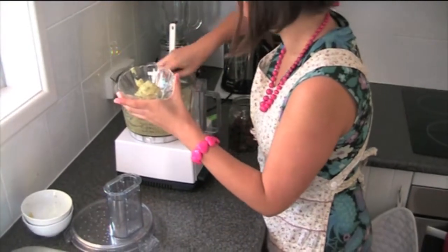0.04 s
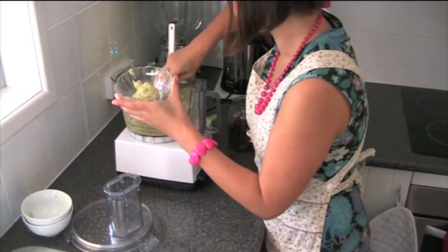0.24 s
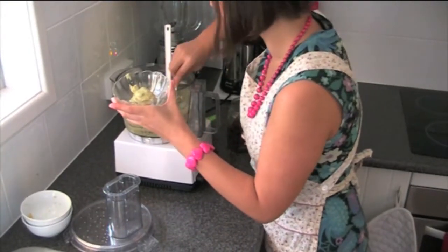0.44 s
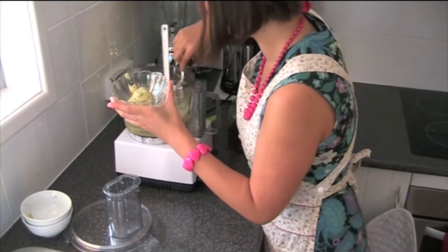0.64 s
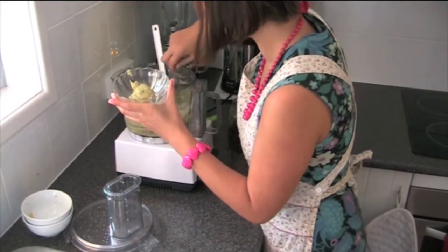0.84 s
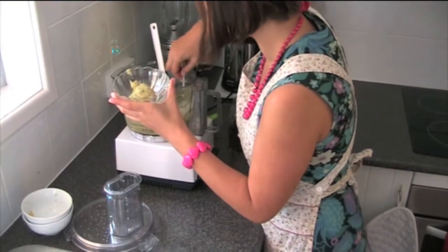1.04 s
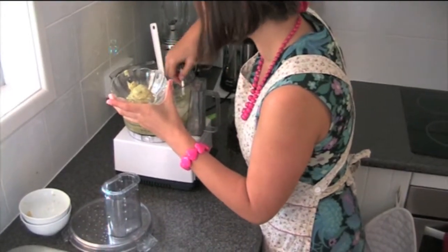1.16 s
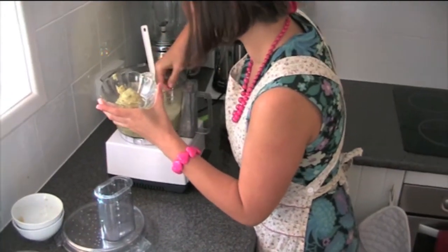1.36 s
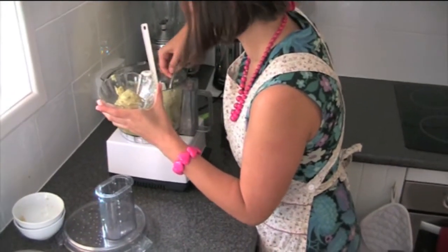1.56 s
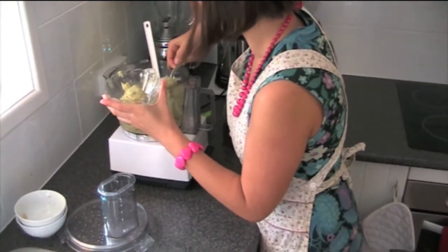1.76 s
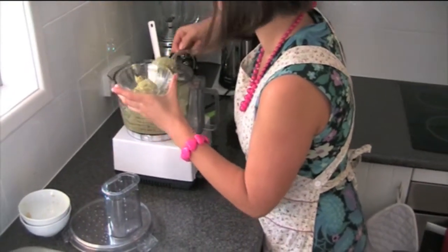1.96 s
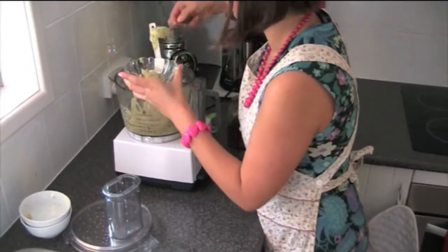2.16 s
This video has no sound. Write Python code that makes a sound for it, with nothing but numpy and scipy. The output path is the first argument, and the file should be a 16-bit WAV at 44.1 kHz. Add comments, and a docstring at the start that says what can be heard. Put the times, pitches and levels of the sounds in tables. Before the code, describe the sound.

Spoon knocks on a plastic processor bowl, close in stereo, start with a hard blow at 0 s. More knocks come at 0.16-0.2, then a bright squeaky scrape rises and falls from 0.25 to 0.4. Irregular hollow clatter runs 0.65-1.08, strongest near 0.8. Softer knocks and squeaks come at 1.24-1.4, then faint sticky smacks and a light tap at 1.55-1.8. Short tiled-kitchen echoes, very faint hum.

```python
"""A hard knock opens the take: a metal spoon scoops food from a plastic processor bowl, close to a stereo
microphone in a small tiled kitchen. Bursts of tiny touches set the bowl's modes ringing; sliding over fine
ridges squeaks at the ridge rate and its multiples, with a noise hiss. Late on come a light tap of ringing
modes and puffs of noise as sticky food lets go. Decaying noise gives the echoes, coloured noise the hum."""
import sys
import numpy as np
from scipy import signal
from scipy.fft import rfft, irfft, next_fast_len
from scipy.io import wavfile
from scipy.ndimage import uniform_filter1d

SR = 44100
rng = np.random.default_rng(int(sys.argv[2]) if len(sys.argv) > 2 else 0)


def inscribe(sig):
    """Save sig as 16-bit PCM at rate SR to the path in sys.argv[1].

    A 1-D sig is mono; a 2-D sig holds one channel per row.
    Samples are clipped to [-1, 1] before scaling.
    """
    pcm = np.round(np.clip(np.atleast_2d(sig).T, -1, 1) * 32767)
    wavfile.write(sys.argv[1], SR, pcm.astype(np.int16))


N = 97505
CUTOFF_HZ = 15800   # squeak partials stop here; the treble of the whole scene ends just above


def from_db(db):
    """Decibels to an amplitude factor."""
    return 10 ** (np.asarray(db) / 20)


def rms_one(x):
    """Scale a signal to rms 1."""
    return x / np.sqrt(np.mean(x ** 2) + 1e-20)


def at_hz(points, hz):
    """Read a frequency table at hz, in straight lines over log frequency."""
    points = np.array(points)
    return np.interp(np.log(hz), np.log(points[:, 0]), points[:, 1])


def bin_hz(size):
    """Spectrum bin frequencies, kept above zero for the logarithm."""
    return np.maximum(np.fft.rfftfreq(size, 1 / SR), 1)


def band(x, low, high):
    """Pass only low to high [Hz]."""
    return signal.sosfilt(signal.butter(2, [low, high], "band", fs=SR, output="sos"), x + 1e-18)


def drift(rate, count):
    """Smooth random wander, spread 1: noise through two equal low-passes at rate [Hz]."""
    r = np.exp(-2 * np.pi * rate / SR)
    noise = rng.standard_normal(count + 2000)
    return rms_one(signal.lfilter([1], [1, -2 * r, r * r], noise)[2000:])   # skip the settling


def ring(clicks, hz, t60):
    """A resonator: a unit click starts a sine of height 1 that falls 60 dB in t60 [s]."""
    r = from_db(-60 / (t60 * SR))
    w = 2 * np.pi * hz / SR
    return signal.lfilter([0, np.sin(w)], [1, -2 * r * np.cos(w), r * r], clicks + 1e-18)


def left_right(mid, side, alike):
    """Mix two independent spectra into left and right with the given likeness."""
    return np.sqrt(1 + alike) * mid + np.sqrt(1 - alike) * side * [[1], [-1]]


# likeness of the left and right channels for steady noise: (frequency [Hz], likeness [-1 to 1])
NOISE_LIKENESS = [(30, -0.56), (100, -0.18), (300, -0.66), (1000, -0.23), (4000, 0.12), (12000, 0.072)]


def coloured(spectrum):
    """Stereo noise shaped by a spectrum table, left and right alike by band; rms 1."""
    hz = bin_hz(N)
    mid, side = rfft(rng.standard_normal((2, N))) * from_db(at_hz(spectrum, hz))
    return rms_one(irfft(left_right(mid, side, at_hz(NOISE_LIKENESS, hz)), N))


# spectrum shape of the room's faint hum: (frequency [Hz], relative level [dB per Hz])
HUM_SPECTRUM = [(20, -0.5), (45, 0.5), (91, 6), (168, -4.5), (248, 6), (357, -1.5), (700, -4.5), (786, 3),
                (880, -9), (1200, -8.5), (2080, -7.5), (2400, -10), (3500, -9.5), (7000, -16.5),
                (13500, -30), (16000, -28)]
HUM_DB = -49.5   # rms


def room_hum():
    """The kitchen's background: steady noise, strongest in the bass."""
    return from_db(HUM_DB) * coloured(HUM_SPECTRUM)


# how long the tiled kitchen rings: (frequency [Hz], 60 dB decay [s])
KITCHEN_DECAY = [(200, 0.56), (1000, 0.36), (4000, 0.39), (12000, 0.15)]
# likeness of the reverberation in the two channels: (frequency [Hz], likeness [-1 to 1])
ECHO_LIKENESS = [(300, .9), (1000, .88), (3000, .72), (10000, .5)]
ECHO_BUILD_S = 0.0011


def kitchen(x):
    """Dense echoes off the tiles: noise that builds up, then dies at its own pace in each band."""
    t = np.arange(SR) / SR
    edges = 150 * 2 ** np.arange(0, 7, .74)
    tail = 0
    for low, high in zip(edges, edges[1:]):
        decay = from_db(-60 * t / at_hz(KITCHEN_DECAY, low))
        tail = tail + band(rng.standard_normal((2, SR)), low, high) * decay
    tail = tail * (1 - np.exp(-t / ECHO_BUILD_S)) / np.sqrt(np.sum(tail ** 2) / 2)
    size = next_fast_len(N + SR)
    mid, side = rfft(tail, size)
    stereo_tail = left_right(mid, side, at_hz(ECHO_LIKENESS, bin_hz(size)))
    return irfft(stereo_tail * rfft(x, size), size)[:, :N]


# sticky food letting go: (time [s], level before band-passing [dB], decay time constant [s])
SMACKS = [(1.555, -48, 0.0049), (1.636, -43, 0.02), (1.787, -45, 0.0084)]


def smacks():
    """Sticky food lets go: bright puffs of noise that start at once and die away."""
    t = np.arange(N) / SR
    level = np.zeros(N)
    for start, db, length in SMACKS:
        level += from_db(db) * (t > start) * np.exp(-np.abs(t - start) / length)
    return level * band(rng.standard_normal((2, N)), 5160, 10100)


# modes of something small and hard: (frequency [Hz], relative level [dB], 60 dB decay [s])
TAP_MODES = [(1870, 1, .04), (3070, 0, .018), (1500, -2, .008), (3700, -4, .006)]
TAP_S, TAP_DB = 1.716, -37   # time, level of the click that drives the modes


def tap():
    """A light tap on something small and hard: one click rings a few short modes."""
    click = np.zeros(N)
    click[int(TAP_S * SR)] = from_db(TAP_DB)
    modes = sum(from_db(db) * ring(click, hz, t60) for hz, db, t60 in TAP_MODES)
    return band(modes, 1300, 9000)


# spoon slides: (time [s], ridges crossed per second [Hz], squeak level [dB], rubbing level [dB])
SLIDE_UP = [(.25, 1700, -42, -45), (.262, 2000, -31, -40), (.297, 3400, -35, -40), (.312, 4130, -33, -46),
            (.325, 4380, -33, -46), (.339, 4230, -34, -44), (.352, 3400, -34, -39), (.372, 1600, -37, -36),
            (.4, 500, -41, -41)]
SLIDE_BACK = [(1.268, 1753, -45, -44), (1.284, 2310, -41.5, -46), (1.305, 2245, -40.5, -55),
              (1.325, 2075, -39, -51), (1.344, 1770, -33.5, -58)]
SLIDE_SLOW = [(1.338, 800, -47, -46), (1.358, 790, -46, -41), (1.41, 780, -60, -54)]
# ridge rate and its multiples, at full speed: (relative level [dB]), lowest first
OVERTONE_DB = [0, -4, -4.5, -14, -14, -17, -19, -19]
# spectrum shape of the rubbing hiss: (frequency [Hz], relative level [dB per Hz])
RUB_SPECTRUM = [(300, -10), (1000, -14), (2500, -4.5), (5000, -13.5), (11000, -10), (13500, -14),
                (16000, -43)]
SQUEAK_FLUTTER_DB, SQUEAK_WOBBLE_HZ = 3, 55          # spreads of partial level and ridge rate
FULL_SPEED_HZ, OVERTONE_DB_PER_KHZ = 4300, 3.5       # the multiples weaken at slower rates


def slides():
    """Ridges passing under the spoon sing at their rate and its multiples; a rubbing hiss goes along."""
    squeak, rub = np.zeros(N), np.zeros(N)
    for rows in (SLIDE_UP, SLIDE_BACK, SLIDE_SLOW):
        s, hz, db, rub_db = np.transpose(rows)
        at = np.arange(int(s[0] * SR), int(s[-1] * SR))
        fade = np.clip(np.minimum(at - at[0], at[-1] - at) / (0.005 * SR), 0, 1)
        glide = uniform_filter1d(np.interp(at / SR, s, hz), size=600, mode="nearest")
        speed_db = OVERTONE_DB_PER_KHZ * (glide - FULL_SPEED_HZ) / 1000
        rate = glide + SQUEAK_WOBBLE_HZ * drift(570, len(at))
        turn = 2 * np.pi * np.cumsum(rate) / SR
        tone = np.zeros(len(at))
        for k, level in enumerate(OVERTONE_DB, start=1):
            flutter_db = SQUEAK_FLUTTER_DB * drift(144, len(at))
            # speed spares the ridge rate itself, counts once for the second and twice above
            partial_db = level + speed_db * min(k - 1, 2) + flutter_db
            tone += from_db(partial_db) * np.sin(k * turn) * (k * rate < CUTOFF_HZ)
        squeak[at] += fade * from_db(np.interp(at / SR, s, db)) * tone
        rub[at] += fade * from_db(np.interp(at / SR, s, rub_db))
    return squeak + rub * rms_one(coloured(RUB_SPECTRUM)[0])


# borders of the seven bands that each knock excites: (frequency [Hz])
BAND_EDGES_HZ = [230, 420, 1000, 1350, 2050, 2500, 4500, 13000]
# spoon on the bowl wall: (time [s], force level in the top band [dB], chatter decay time constant [s],
# then six force levels in the lower bands, from the boom upwards [dB])
KNOCKS = [(0.0004, -19.5, 0.0069, -30.5, -23.5, -26.5, -36, -24, -20),
          (0.158, -23.5, 0.012, -53, -28.5, -25.5, -32.5, -32, -40.5),
          (0.1768, -41.5, 0.0058, -34.5, -33.5, -22, -27.5, -29, -35),
          (0.2031, -25, 0.0061, -34, -53, -25.5, -32, -47, -26),
          (0.4013, -25, 0.0065, -37.5, -29, -29, -32, -33, -23.5),
          (0.4112, -68, 0.0024, -32.5, -33, -28.5, -36, -35, -30.5),
          (0.6471, -39.5, 0.006, -58, -36, -37, -51, -33, -62),
          (0.6504, -24, 0.0072, -35, -34, -29.5, -27, -22.5, -27.5),
          (0.6558, -60, 0.0032, -37, -40, -36, -26, -24, -42),
          (0.6662, -52, 0.011, -33, -36, -34, -55, -31, -59),
          (0.6978, -61, 0.0023, -38.5, -42, -39, -47, -32.5, -67),
          (0.7742, -22.5, 0.0056, -36, -38, -40, -25.5, -29, -29.5),
          (0.8007, -18.5, 0.0043, -40.5, -16.5, -24.5, -31, -24, -18),
          (0.8154, -61, 0.0026, -54, -22, -36, -62, -35.5, -52),
          (0.8567, -36.5, 0.009, -33.5, -41, -40, -30, -49, -63),
          (0.9654, -31.5, 0.0041, -56, -30, -21.5, -39, -22, -69),
          (0.9772, -62, 0.0046, -35.5, -36, -30, -25.5, -45, -36),
          (1.0203, -41, 0.0061, -26.5, -27.5, -26, -37, -60, -34),
          (1.0842, -43, 0.024, -47, -49, -51, -48, -59, -38.5),
          (1.237, -43, 0.0067, -64, -36.5, -42, -46, -40.5, -44),
          (1.2484, -46, 0.014, -34.5, -38, -47, -43, -46.5, -43),
          (1.2644, -37.5, 0.01, -38.5, -37.5, -38.5, -34.5, -58, -53),
          (1.2861, -46, 0.011, -45, -37, -41.5, -48, -45, -38)]
TOUCHES_PER_S, TOUCH_SPREAD_DB = 3000, 1.5
FIRST_TOUCH_DB, TOUCH_RISE_S = 7, 0.0015   # first touch before the rise; slope of the rise
BOOM_LAG_S = .007                          # the boom swells after the blow


def touches():
    """Each knock is a first touch and a dying chatter of random ones; one force train per band."""
    force = np.zeros((len(BAND_EDGES_HZ) - 1, N + SR))
    span = np.arange(SR // 20)
    t = span / SR
    for start, top_db, length, *lower_db in KNOCKS:
        hit = rng.random(len(span)) < TOUCHES_PER_S / SR
        strength = from_db(TOUCH_SPREAD_DB * rng.standard_normal(len(span)))
        train = hit * strength * rng.choice([-1, 1], len(span))
        train[0] = from_db(FIRST_TOUCH_DB)
        train = train * np.exp(-t / length) * np.minimum(0.42 + t / TOUCH_RISE_S, 1)
        train /= np.sqrt(np.sum(train ** 2))
        force[:, int(start * SR) + span] += from_db(lower_db + [top_db])[:, None] * train
    force[0] = np.roll(force[0], int(BOOM_LAG_S * SR))
    return force[:, :N]


# modes of the plastic bowl: (frequency [Hz], relative level [dB], 60 dB decay before the cap [s])
BOWL_MODES = [(289, 9, 0.081), (318, -1.5, 0.13), (451, -8, 0.067), (500, -3.5, 0.04), (570.6, -6, 0.14),
              (622, 8, 0.016), (890, 0.5, 0.1), (1095, 1.5, 0.05), (1168, -0.5, 0.013), (1500, -5, 0.052),
              (1904, 5, 0.038), (2224, 6.5, 0.07), (2358, 3.5, 0.038), (3090, 0, 0.02), (3680, 0, 0.021)]
LONGEST_RING_CYCLES = 50   # caps the 60 dB decay
RING_DB, CRACK_DB = -6, -30.5


def bowl(force):
    """The modes ring to the touches of their band; each band also cracks at once."""
    out = np.zeros(N)
    for hz, db, t60 in BOWL_MODES:
        k = np.searchsorted(BAND_EDGES_HZ, hz) - 1
        out += from_db(db + RING_DB) * ring(force[k], hz, min(t60, LONGEST_RING_CYCLES / hz))
    for k, (low, high) in enumerate(zip(BAND_EDGES_HZ, BAND_EDGES_HZ[1:])):
        even_level = SR / np.sqrt(high - low)   # offsets the band's width
        out += from_db(CRACK_DB) * even_level * band(force[k], low, high)
    return signal.sosfilt(signal.butter(2, 9000, fs=SR, output="sos"), out)   # dull the tick


# phase difference between left and right by frequency: (frequency [Hz], phase [radians])
PHASE_DIFFERENCE = [(250, 0.5), (1000, -1.06), (2900, 0), (5300, -1.9), (11000, 4), (13500, -3)]
PAN_DB, TREBLE_PAN_DB, TAP_PAN_DB = -0.8, 8.5, 4.5   # left over right; treble pan adds to the first
KITCHEN_DB, SLIDE_ECHO_DB = -7, -5                   # sliding fills the room less than blows


def spoon_in_stereo(spoon):
    """The close spoon in two channels: level and phase differ from left to right by frequency."""
    side = np.array([[.5], [-.5]])
    treble = band(spoon, 1300, 13500)
    near = spoon * from_db(PAN_DB * side) + treble * (from_db(TREBLE_PAN_DB * side) - 1)
    phase_turn = np.exp(-1j * at_hz(PHASE_DIFFERENCE, bin_hz(N)))
    return np.array([near[0], irfft(rfft(near[1]) * phase_turn, N)])


def scene():
    """Spoon and tap close to the microphone, their echoes, sticky smacks and the hum behind."""
    no_bass = signal.butter(4, 182, "high", fs=SR, output="sos")
    knocks, slide = signal.sosfilt(no_bass, [bowl(touches()), slides()])
    tick = tap()
    near = spoon_in_stereo(knocks + slide) + tick * from_db(TAP_PAN_DB * np.array([[.5], [-.5]]))
    into_room = knocks + from_db(SLIDE_ECHO_DB) * slide + .5 * tick
    echoes = from_db(KITCHEN_DB) * kitchen(into_room)
    return near + echoes + smacks() + room_hum()


def record(dry):
    """The top is cut: a steep low-pass, 70 dB down from 500 Hz above the cutoff."""
    return signal.sosfilt(signal.cheby2(12, 70, CUTOFF_HZ + 500, fs=SR, output="sos"), dry)


dry = scene()
out = record(dry)
inscribe(out)
```